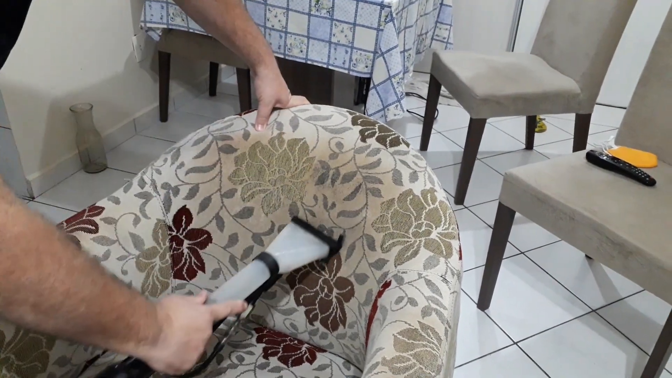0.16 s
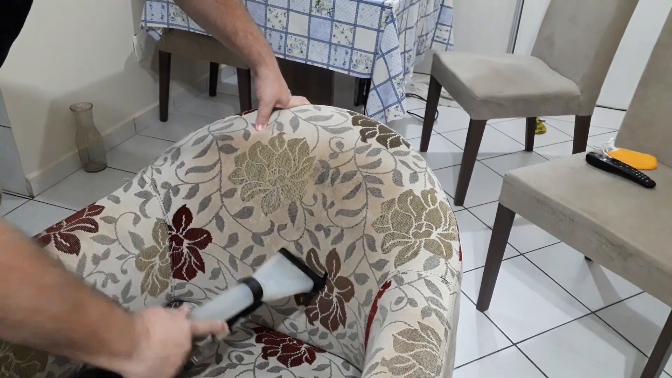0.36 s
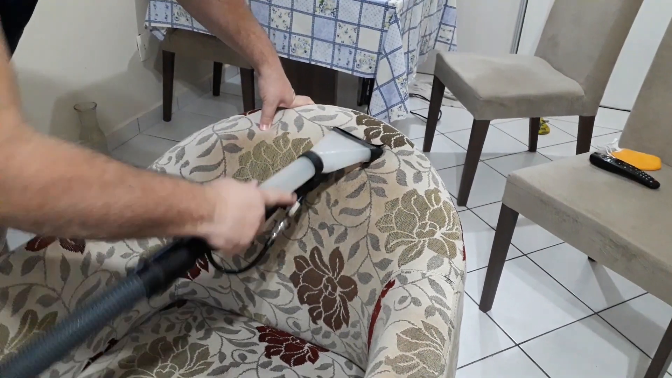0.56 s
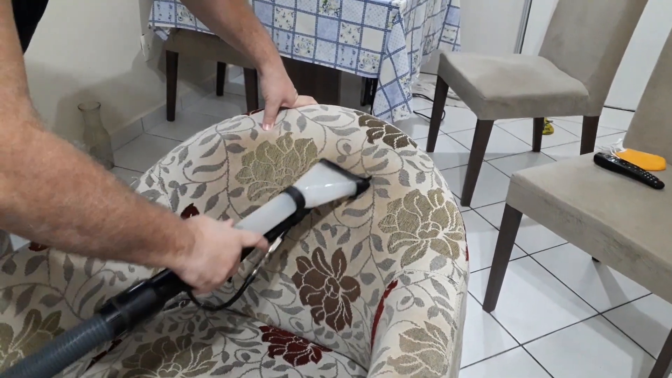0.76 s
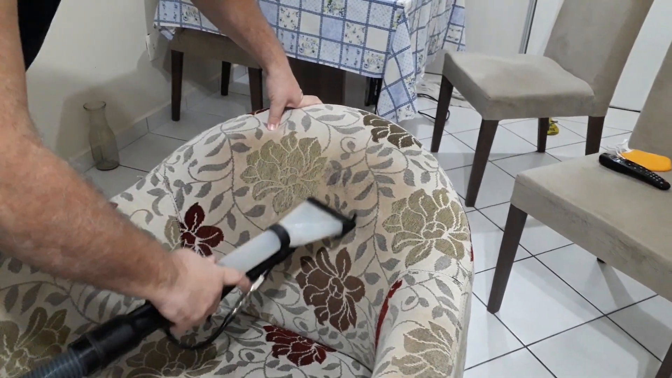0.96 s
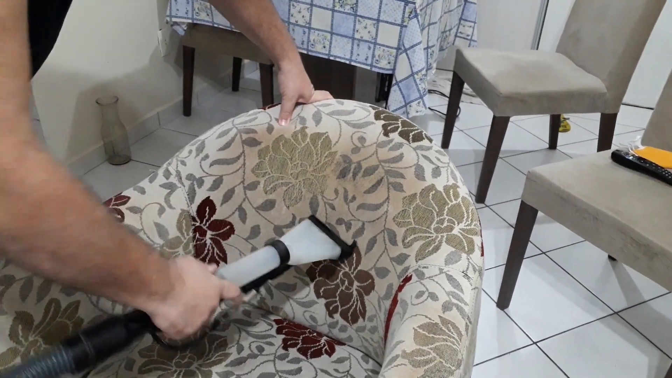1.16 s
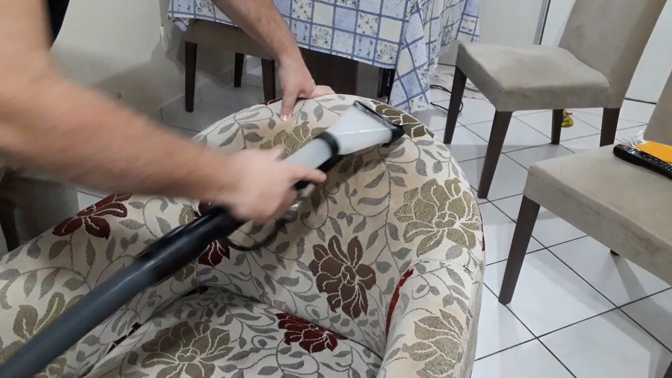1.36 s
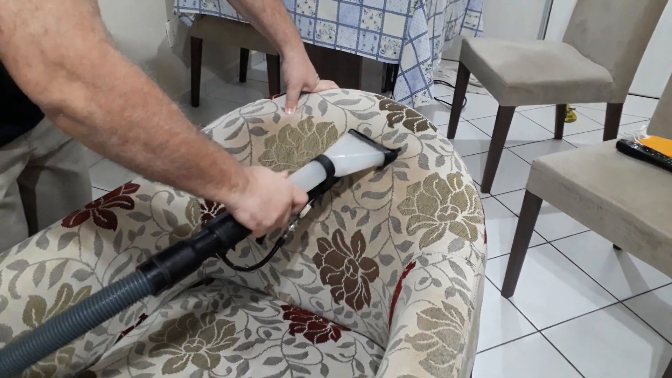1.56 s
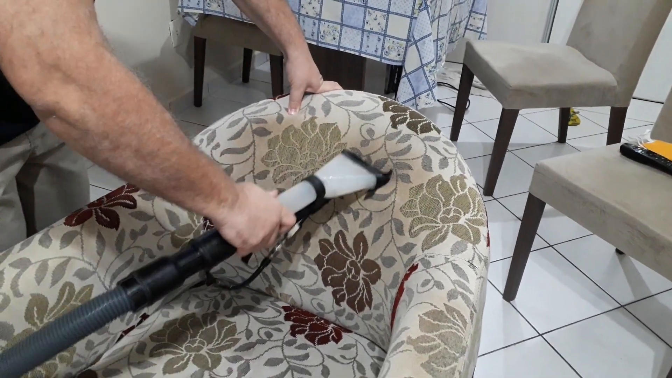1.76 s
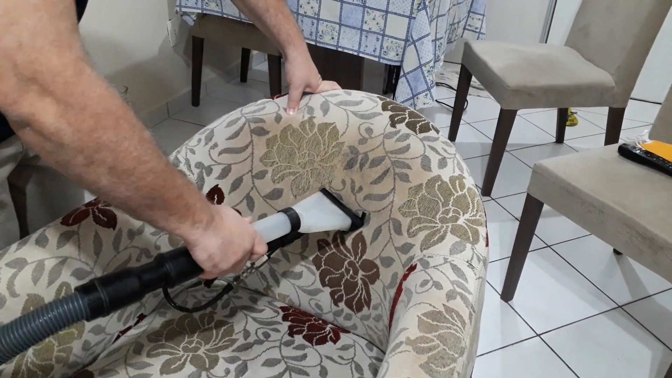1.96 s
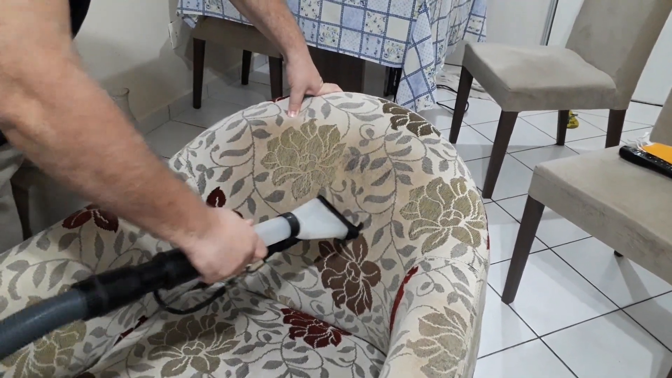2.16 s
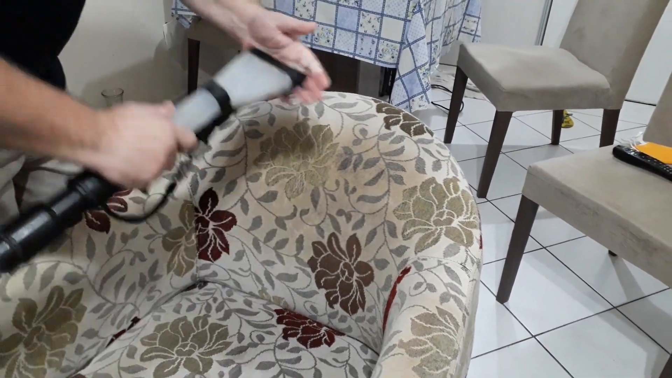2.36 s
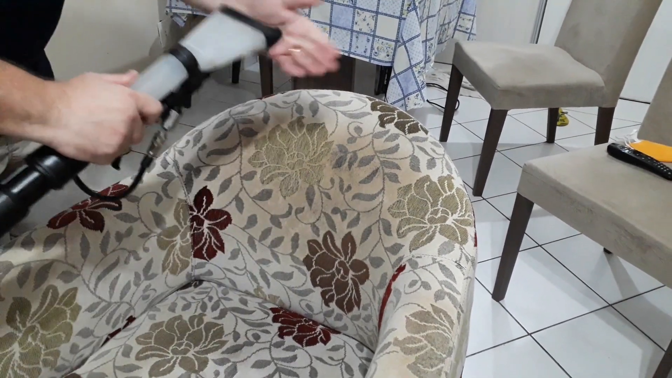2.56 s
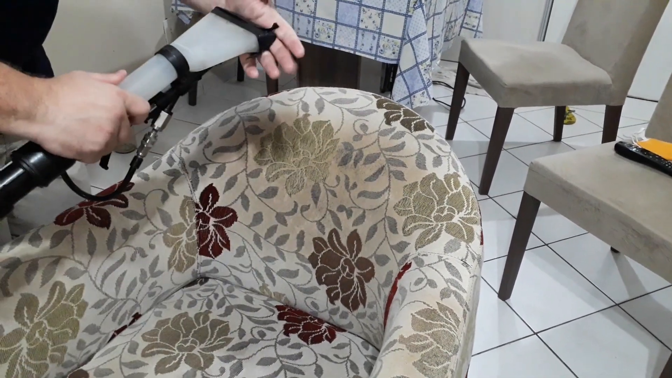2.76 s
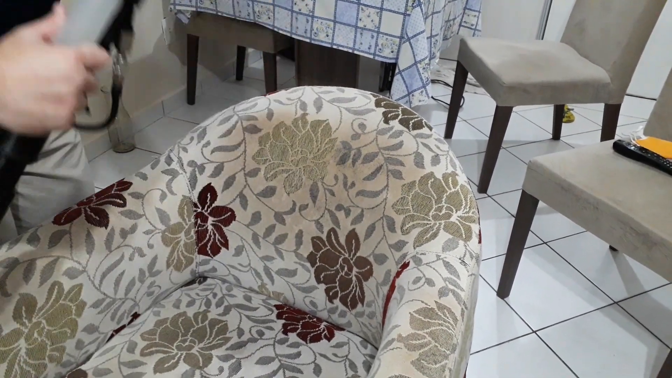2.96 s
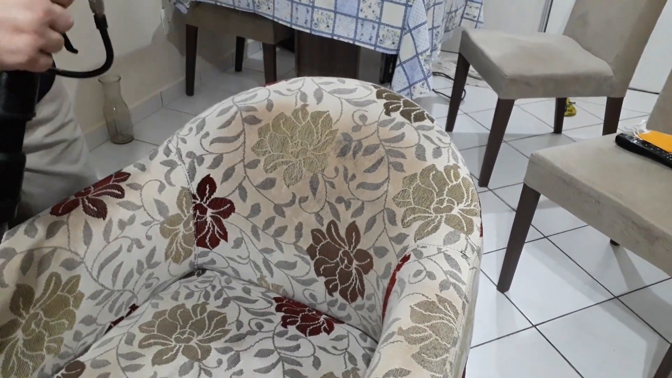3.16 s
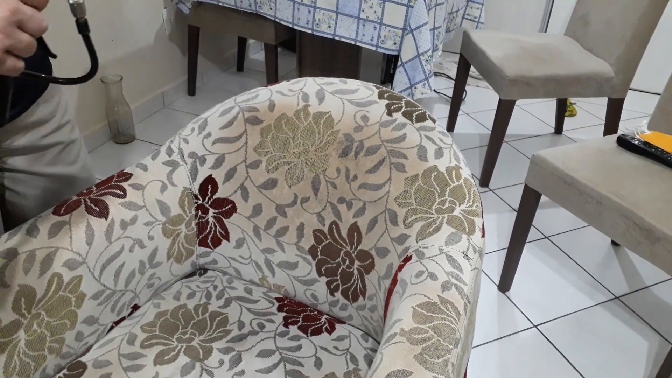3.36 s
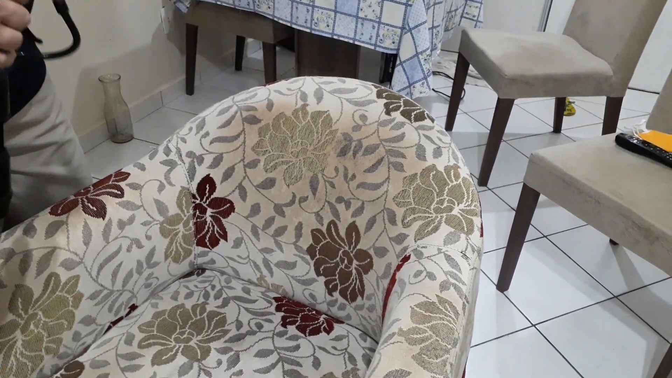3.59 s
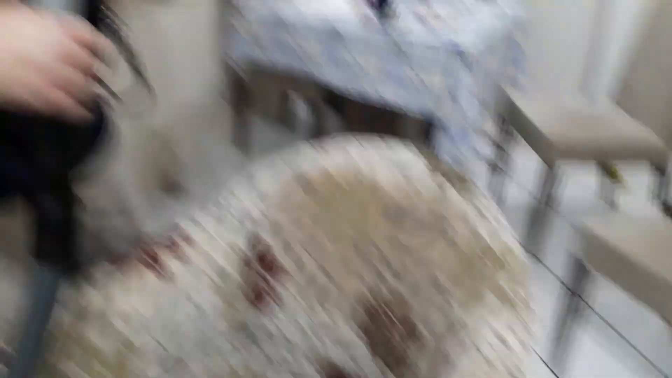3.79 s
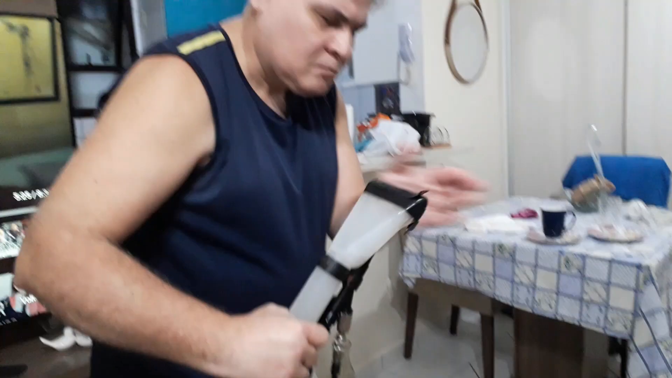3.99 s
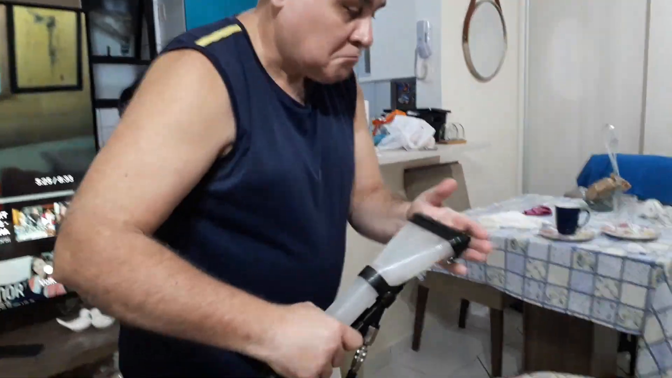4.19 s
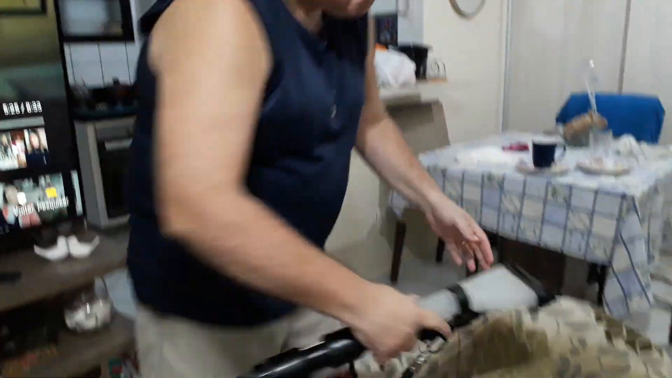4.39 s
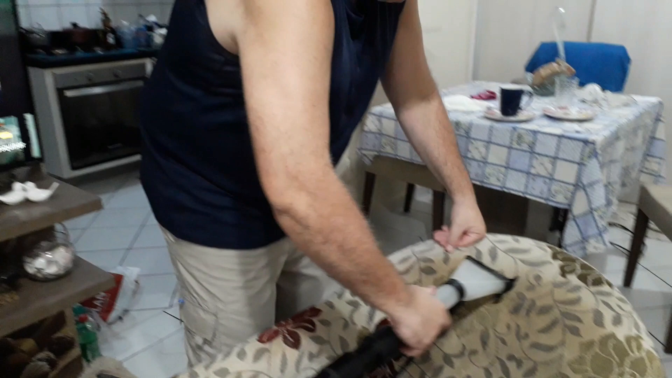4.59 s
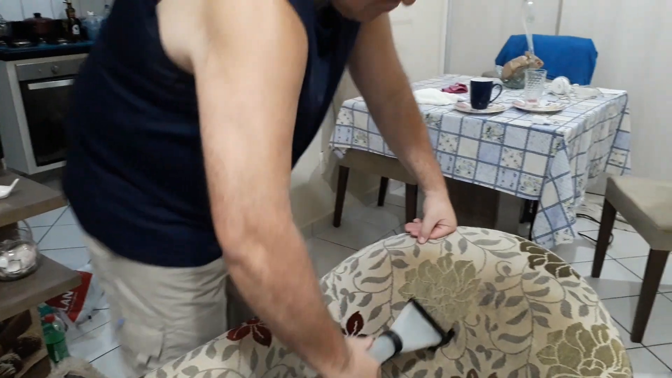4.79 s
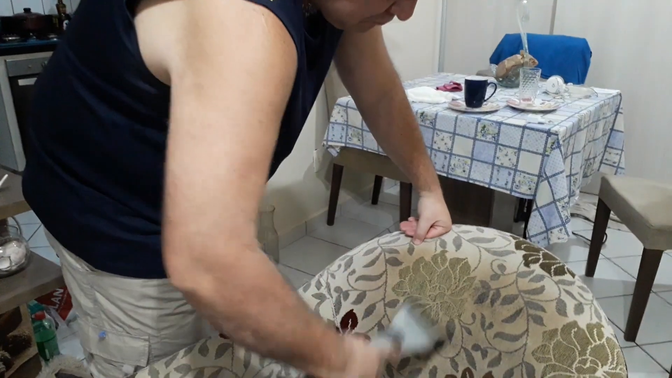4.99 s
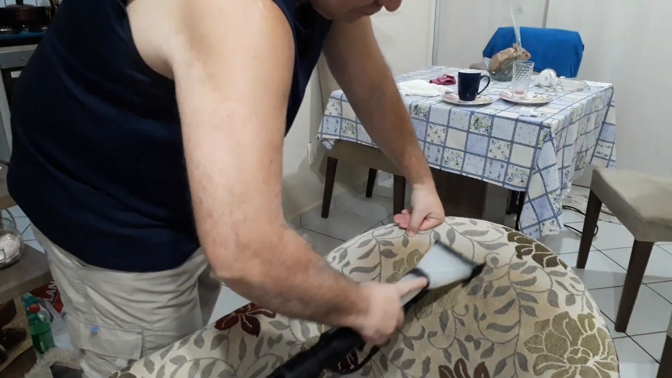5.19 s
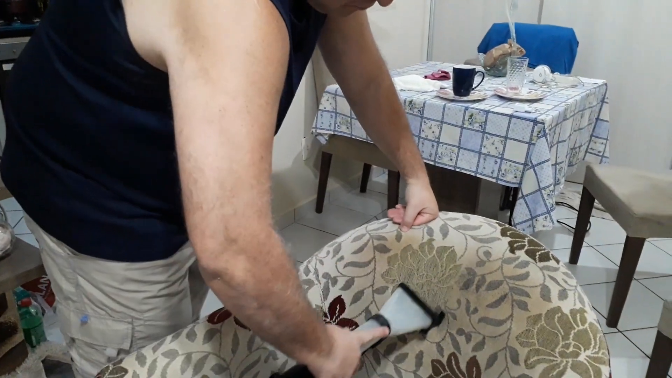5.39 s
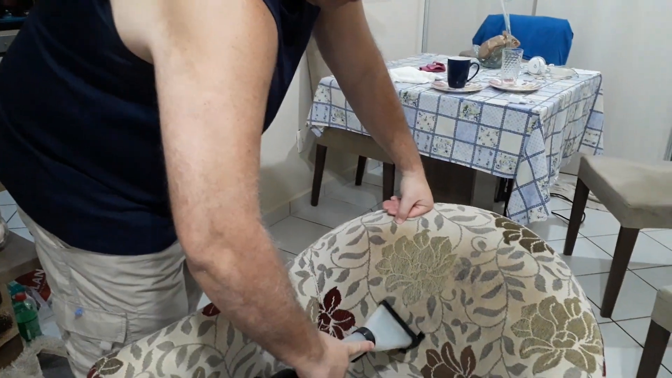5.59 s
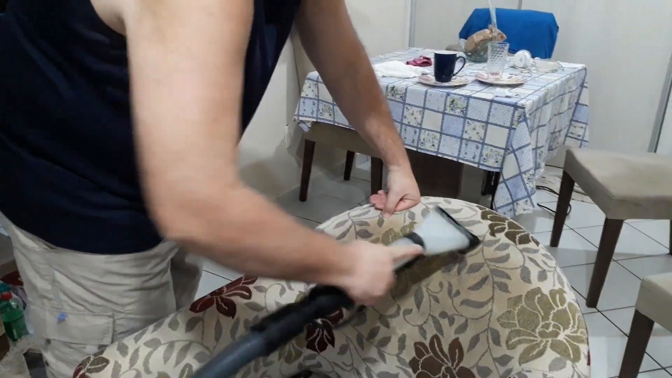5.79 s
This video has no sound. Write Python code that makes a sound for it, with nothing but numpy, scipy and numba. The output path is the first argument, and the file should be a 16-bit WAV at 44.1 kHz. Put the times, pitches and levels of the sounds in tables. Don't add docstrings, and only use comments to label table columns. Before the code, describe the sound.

A wet vacuum whines and roars close by in a tiled room, its nozzle slurping damp fabric, broken twice by chirping bursts and pops.

```python
import sys
import numpy as np
from scipy import signal
from scipy.fft import rfft, irfft, next_fast_len
from scipy.io import wavfile
from scipy.ndimage import uniform_filter1d
from numba import njit

SR = 44100
rng = np.random.default_rng(int(sys.argv[2]) if len(sys.argv) > 2 else 0)


def field_ratio(decibels):
    return 10 ** (np.asarray(decibels, dtype=float) / 20)


def transcribe(u):
    v = np.clip(np.atleast_2d(u).T, -1, 1)
    q = np.round(v * 32767).astype(np.int16)
    wavfile.write(sys.argv[1], SR, q)


N = 257544

# shaft_multiple, level_db at rest speed, slope_db_per_hz of shaft speed, lifted_db, waver
FAN_ORDERS = [
    (12, -24.5, 0.46, 2.5, 0.33),
    (5, -27, -.3, -19, .45),
    (1, -43.5, 3, -7, .55),
    (6, -36.5, 0.23, -4, 0.55),
    (24, -45, 1, 1.5, .4),
]
# grips_s, lifts_s, blade_tone_reached_hz, sag_time_s
SEALS = [
    (-.3, 0.461, 3964, .09),
    (.61, 1.25, 4010, .115),
    (1.42, 2.219, 4015, .17),
    (2.42, 2.57, 4004, .22),
    (2.719, 2.829, 3992, .175),
    (3.961, 4.03, 3935, .33),
    (4.6, 5.0, 4000, 0.22),
    (5.2, 5.66, 4013, .27),
]
# time_s, level_db
BEAM = [(0, -3), (.3, -0.5), (.98, -2), (1.13, 5.5), (1.32, -1.5), (2.2, -1.3), (2.8, -1.5), (3.1, 1.5),
        (3.4, -2.5), (3.7, -3), (3.85, 0.5), (4.1, -2.3), (4.4, -4.5), (4.72, 3.5), (4.87, 1.5), (5.05, 2),
        (5.84, 1.3)]
# time_s, microphone_gain_db, lifted (nozzle off the fabric, 0-1)
HANDLING = [(0, -0.5, .13), (1.3, 0.16, .08), (1.55, -0.7, .25), (1.85, -0.54, 0.16), (2.3, 0.4, .15),
            (2.4, -0.3, 0.37), (2.6, -6.5, 0.27), (2.9, -10.5, .35), (3.15, -9.5, 0.47), (3.5, -1, 0.82),
            (3.85, -0.5, 0.93), (4.03, -2.5, 0.27), (4.4, -7, 0.42), (4.72, -7.5, .35), (4.77, -6.5, 0.03),
            (5.05, 0.5, .01), (5.84, -0.85, 0.09)]
# start_s, length_s, body_db, slot_db
PASSES = [
    (-.3, 0.76, -28, -22.5),
    (.48, 0.8, -23, -22.5),
    (1.395, 0.77, -22.5, -24.5),
    (2.3, 0.51, -29, -26),
    (3.5, .85, -27.5, -32),
    (4.576, 0.51, -26, -25),
    (5.12, 0.55, -23.5, -24.5),
]
# centre_hz, width_hz, level_db
BODY_MODES = [(3446, 670, 1.3), (4000, 1500, -1), (4180, 560, -2), (4580, 850, -0.1), (5200, 600, -7),
              (5760, 450, -3.5)]
# frequency_hz, level_db (per Hz)
SLOT_COLOUR = [(4000, -12), (5500, 0), (6500, 3), (8500, 0.5), (10000, 2.5), (11500, -0.5), (13000, -1),
               (14000, -10.5), (16000, -4.5)]
# frequency_hz, level_db (per Hz)
ROAR_COLOUR = [(25, -47.5), (145, -15.5), (220, -19), (330, -6), (570, -14.3), (800, -7.2), (1500, -10.2),
               (2500, -10.5), (3800, -6), (5200, -12), (9900, -14.5), (12500, -22), (14000, -24),
               (16000, -23)]
# centre_hz, width_hz, level_db
HOSE_MODES = [(371, 32, -23.5), (880, 79, -28), (6310, 125, -19.5), (8380, 193, -23.5), (9800, 290, -17),
              (11700, 120, -28)]
# start_s, length_s, level_db, swell_db, edge_tone_share
SWEEPS = [(2.373, 0.023, -18, 2, 0.195), (2.423, 0.037, -13, -2, 0.62), (2.46, 0.053, -17.5, -5, 0.98),
          (2.51, 0.038, -14.5, 0.5, 0.99), (2.547, 0.026, -19.5, -5, .1), (2.67, 0.1456, -28, 1.5, 0.9),
          (3.875, 0.0937, -13.5, 2.5, 0.66), (3.973, 0.0307, -14, -6, .1), (4.092, 0.0133, -17, 2, 0.31),
          (4.102, 0.0297, -17, -8, 0.29), (4.178, 0.022, -15, 1, .4), (4.207, 0.038, -19.5, -9, .2)]
# frequency_hz, level_db (per Hz)
SWEEP_COLOUR = [(1500, -19), (3000, -3), (4500, -0.5), (7000, -2.5), (10000, -2), (13000, -4.5),
                (16000, -8)]
# start_s, length_s, from_hz, to_hz, level_db
WHISTLES = [
    (2.424, 0.042, 5900, 7200, -11),
    (2.433, 0.051, 5000, 3700, -18),
    (2.542, 0.026, 5440, 3420, -12.5),
    (2.785, 0.062, 4200, 2000, -26),
    (3.869, 0.076, 3020, 3900, -16.5),
    (3.964, 0.04, 8500, 2700, -12.5),
    (4.092, 0.048, 6000, 2700, -16.5),
    (4.174, 0.022, 2500, 6500, -18),
    (4.202, 0.038, 4210, 2280, -15),
]
# start_s, peak_db, push_ms, ring_hz, t60_s
PLOPS = [
    (0.554, -26, .8, 110, .04),
    (1.398, -17.5, 0.28, 97, 0.033),
    (2.388, 3.5, 0.0216, 2500, .005),
    (2.537, -12, 0.22, 695, 0.0144),
    (2.5402, -0.5, 0.16, 86.4, 0.036),
    (2.5411, 0.5, 0.064, 1390, 0.014),
    (3.975, -23, 0.7, 100, .04),
    (4.180, -4.5, 0.0646, 902, 0.0106),
    (5.104, -21, 0.39, 118.8, 0.055),
]
# time_s, from_hz, to_hz, level_db
SIDE_PATCHES = [(0.01, 3810, 6100, -25), (0.166, 3800, 8600, -25.5), (0.236, 9300, 11400, -31),
                (0.283, 6500, 8600, -30.5), (0.933, 9960, 12700, -28), (1.515, 12070, 16100, -33.5),
                (2.094, 7850, 12720, -28), (2.096, 3820, 5474, -29.5), (2.164, 7800, 11400, -29),
                (2.719, 3790, 5396, -33), (2.72, 12050, 14700, -39), (2.722, 8600, 11400, -30.5),
                (2.908, 4000, 5890, -38.5), (3.211, 6600, 8500, -39.5), (3.674, 9300, 11400, -31.5),
                (3.676, 4200, 6100, -31), (5.623, 5400, 7300, -33.5)]

BLADES, REST_SHAFT_HZ = 12, 329
FREE_BLADE_HZ, CLIMB_BEND = 3898, .77
IDLE_BODY_DB, IDLE_SLOT_DB, LIFTED_SLOT_DB = -33.5, -30, -8
PASS_SKEW, PASS_ROUND = .7, 1.27
WETNESS = 0.51
ROAR_DB, LIFTED_ROAR_DB = -26, 3.5
ROAR_TOP_DB = 6
WHISTLE_WIDTH_HZ, WHISTLE_PIVOT_HZ, WHISTLE_NARROWING = 3500, 4500, 1.6
PUMP_HZ, PUMP_KICK, PUMP_KICK_MS = 29.25, 0.42, 2.9
PUMP_HUM_DB = -28.5
ROOM_T60_S, ROOM_DB = 0.33, -15
LOW_HZ, TOP_HZ = 45, 15750


def unit(x):
    return x / np.sqrt(np.mean(x ** 2))


def curves(table):
    s, *columns = np.transpose(table)
    return [np.interp(np.arange(N) / SR, s, c) for c in columns]


def walk(rate):
    hold = int(SR / rate)
    levels = np.repeat(rng.standard_normal(N // hold + 1), hold)
    return unit(uniform_filter1d(uniform_filter1d(levels, hold), hold)[:N])


@njit
def resonate(x, hz, width):
    y, band, low = np.empty(len(x)), 0., 0.
    for i in range(len(x)):
        g, k = np.tan(np.pi * hz[i] / SR), width / hz[i]
        v = (band + g * (x[i] - low)) / (1 + g * (g + k))
        band, low, y[i] = 2 * v - band, low + 2 * g * v, k * v
    return y


def turbulence(source, colour, flicker_db, rate):
    hz, db = np.transpose(colour)
    n = next_fast_len(N, True)
    octave = np.log2(np.fft.rfftfreq(n, 1 / SR) + 1)
    shaped = rfft(source, n) * field_ratio(np.interp(octave, np.log2(hz), db))
    total = 0
    for centre in np.arange(np.log2(hz[0]), np.log2(hz[-1]) + .5, .5):
        weight = np.clip(1 - 2 * abs(octave - centre), 0, 1)
        total = total + irfft(shaped * weight, n)[:N] * field_ratio(flicker_db * walk(rate))
    return unit(total)


def shaft_hz():
    t = np.arange(N) / SR
    hz = np.full(N, float(FREE_BLADE_HZ))
    for grips, lifts, top_hz, sag in SEALS:
        start = hz[max(int(grips * SR), 0)]
        climb = start + (top_hz - start) * np.clip((t - grips) / (lifts - grips), 0, 1) ** CLIMB_BEND
        fall = FREE_BLADE_HZ + (top_hz - FREE_BLADE_HZ) * np.exp(-np.maximum(t - lifts, 0) / sag)
        hz = np.where(t < grips, hz, np.where(t < lifts, climb, fall))
    return uniform_filter1d(hz / BLADES, SR // 20)


def motor(gain_db, lifted):
    hz, beam_db = shaft_hz(), curves(BEAM)[0]
    turn = 2 * np.pi * np.cumsum(hz * (1 + 0.00057 * walk(39.96))) / SR
    whine = 0
    for k, db, per_hz, lifted_db, waver in FAN_ORDERS:
        level_db = gain_db + db + per_hz * (hz - REST_SHAFT_HZ) + lifted_db * lifted
        level_db = level_db + beam_db * (k >= BLADES) + 4.5 * waver * walk(30)
        whine = whine + np.sqrt(2) * field_ratio(level_db) * np.sin(round(k) * turn + waver * walk(45))
    return whine


def passes(lifted):
    t = np.arange(N) / SR
    body, slot = field_ratio(IDLE_BODY_DB), field_ratio(IDLE_SLOT_DB + LIFTED_SLOT_DB * lifted)
    for s, length, body_db, slot_db in PASSES:
        progress = np.clip((t - s) / length, 0, 1)
        swell = np.abs(np.sin(np.pi * progress ** PASS_SKEW)) ** PASS_ROUND
        body = body + field_ratio(body_db) * swell
        slot = slot + field_ratio(slot_db) * swell
    return body, slot


def nozzle(body_gain, slot_gain):
    sizes = field_ratio(3.4 * np.minimum(rng.exponential(size=N), 4))
    drops = (rng.random(N) < 1500 / SR) * sizes * rng.choice([-1, 1], N)
    air = (rng.standard_normal(N) + WETNESS * unit(drops)) * field_ratio(walk(30))
    body = 0
    for hz, width, db in BODY_MODES:
        drift = hz * (1 + .01 * walk(5))
        ring = resonate(resonate(air, drift, float(width)), drift, float(width))
        body = body + field_ratio(db + 1.1 * walk(12)) * ring
    return body_gain * unit(body) + slot_gain * turbulence(air, SLOT_COLOUR, 0.94, 12)


def sweeps():
    broad, peaked = np.zeros((2, N))
    for s, length, db, swell_db, edge_share in SWEEPS:
        i, n = int(s * SR), int(length * SR)
        gain = field_ratio(db + np.linspace(-swell_db, swell_db, n))
        broad[i:i + n] += gain
        peaked[i:i + n] += gain * edge_share
    air = rng.standard_normal(N) * field_ratio(2 * walk(120))
    edge = unit(resonate(air, 10200 * (1 + .025 * walk(30)), 2400.))
    broad, peaked = uniform_filter1d([broad, peaked], int(0.0098 * SR))
    return 0.75 * broad * turbulence(air, SWEEP_COLOUR, 1.4, 40) + 0.69 * peaked * edge


def whistles():
    out = np.zeros(N)
    air = rng.standard_normal(N) * field_ratio(2.2 * walk(150))
    for s, length, from_hz, to_hz, db in WHISTLES:
        i, n = int(s * SR), int(length * SR)
        glide = np.geomspace(from_hz, to_hz, n)
        width = WHISTLE_WIDTH_HZ * (WHISTLE_PIVOT_HZ / glide.mean()) ** WHISTLE_NARROWING
        tone = resonate(resonate(air[i:i + n], glide, width), glide, width)
        swell = np.sin(np.pi * (np.arange(n) / n) ** .7) ** .8
        out[i:i + n] += field_ratio(db) * unit(tone) * swell
    return out


def plops():
    out, t = np.zeros(N), np.arange(SR // 5) / SR
    for s, db, push_ms, hz, t60 in PLOPS:
        push = np.exp(-(t * 1000 / push_ms - 2) ** 2 / 2)
        ring = -.4 * np.sin(2 * np.pi * hz * t) * np.exp(-np.log(1000) * t / t60)
        i = int(s * SR)
        out[i:i + len(t)] += field_ratio(db) * (push + ring)
    return out


def roar(db):
    air = turbulence(rng.standard_normal(N), ROAR_COLOUR, 0.85, 12)
    for hz, width, ring_db in HOSE_MODES:
        ring = unit(resonate(rng.standard_normal(N), np.full(N, float(hz)), float(width)))
        air = air + field_ratio(ring_db + 2 * walk(5.977)) * ring
    return field_ratio(db + ROAR_TOP_DB + 0.75 * walk(9)) * air


def pump(air, roar_db):
    strokes = PUMP_HZ * np.arange(N) / SR + .015 * walk(3) + .47
    since_stroke_ms = (strokes % 1) / PUMP_HZ * 1000
    kick = PUMP_KICK * np.exp(-since_stroke_ms / PUMP_KICK_MS) * field_ratio(3.7 * walk(24.84))
    treble = signal.sosfilt(signal.butter(2, 2600, "high", fs=SR, output="sos"), air)
    treble += 1.23 * resonate(air, np.full(N, 4600.), 520.0)
    hum = np.sin(2 * np.pi * 5 * strokes + .6 * walk(15))
    return air + kick * treble + field_ratio(roar_db + PUMP_HUM_DB + 3.4 * walk(6)) * hum


def room(x):
    t = np.arange(int(.6 * SR)) / SR
    tail = rng.standard_normal(len(t)) * np.exp(-np.log(1000) * t / ROOM_T60_S) * (t > .006)
    tail = signal.lfilter([1], [1, -.4], tail)
    return field_ratio(ROOM_DB) * signal.fftconvolve(x, tail / np.sqrt(np.sum(tail ** 2)))[:N]


def side_patches():
    out, frame = np.zeros(N + 4096), 2048
    f = np.fft.rfftfreq(frame, 1 / SR)
    for s, from_hz, to_hz, db in SIDE_PATCHES:
        in_band = (f > from_hz + 300) * (f < to_hz - 250)
        patch = irfft(rfft(rng.standard_normal(frame)) * in_band)
        i = 209 + 1024 * round((s * SR - 209) / 1024)
        out[i:i + frame] += field_ratio(db) * unit(patch) * np.hanning(frame)
    return out[frame // 2:N + frame // 2] * np.array([[1], [-1]])


def scene():
    gain_db, lifted = curves(HANDLING)
    roar_db = ROAR_DB + gain_db + LIFTED_ROAR_DB * lifted
    air = pump(roar(roar_db) + field_ratio(gain_db) * nozzle(*passes(lifted)), roar_db)
    hand = sweeps() + whistles() + plops()
    mono = motor(gain_db, lifted) + air + hand + room(hand)
    return np.array([mono, mono])


def low_pass(x):
    return signal.sosfilt(signal.butter(12, 16890, fs=SR, output="sos"), x)


def record(dry):
    x = signal.sosfilt(signal.butter(1, LOW_HZ, "high", fs=SR, output="sos"), dry)
    rounded = np.tanh(.6 * x) / .6
    x = signal.sosfilt(signal.ellip(14, .2, 90, TOP_HZ, fs=SR, output="sos"), rounded)
    return low_pass(x + side_patches())


dry = scene()
out = record(dry)
transcribe(out)
```